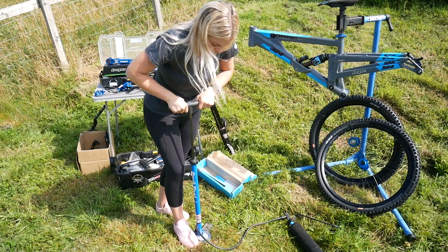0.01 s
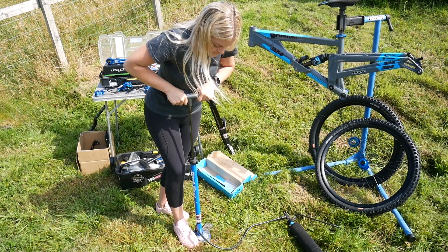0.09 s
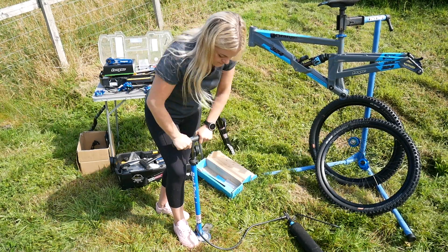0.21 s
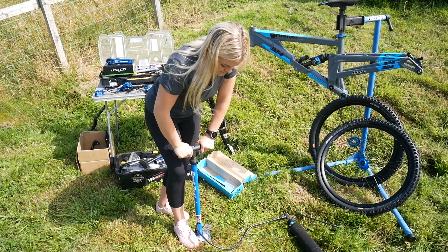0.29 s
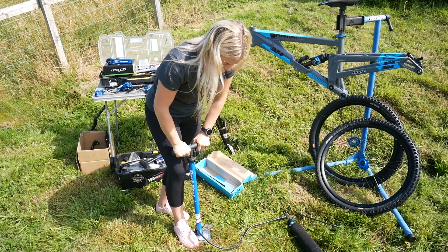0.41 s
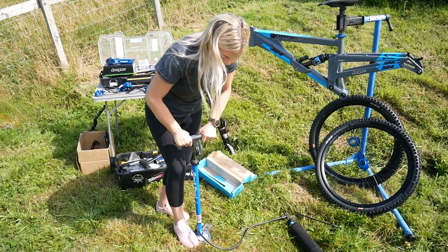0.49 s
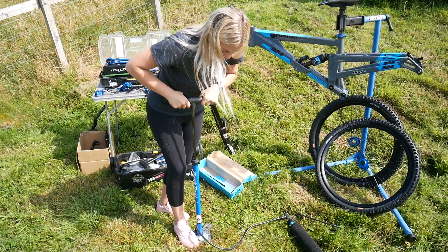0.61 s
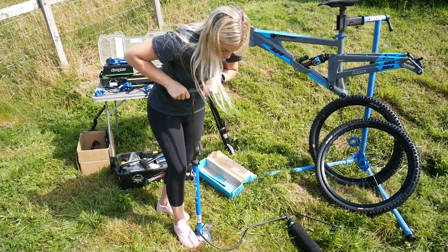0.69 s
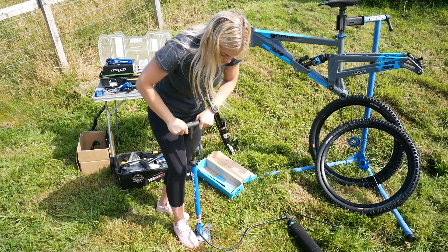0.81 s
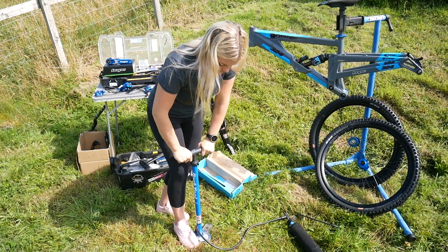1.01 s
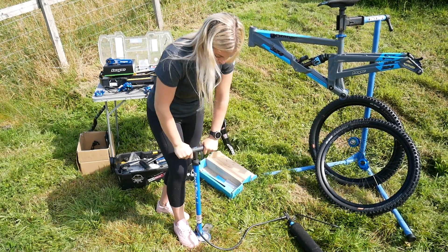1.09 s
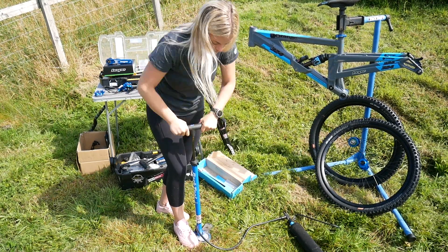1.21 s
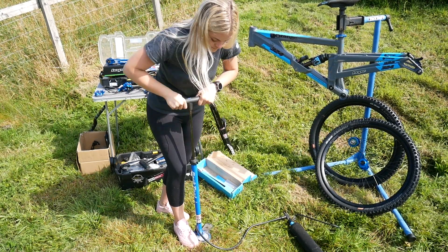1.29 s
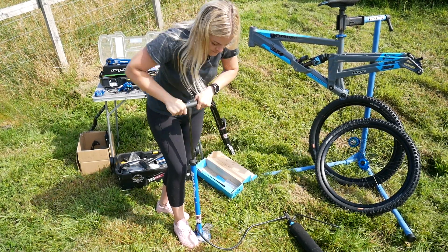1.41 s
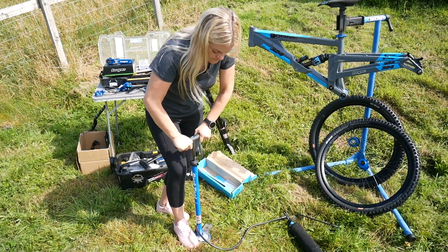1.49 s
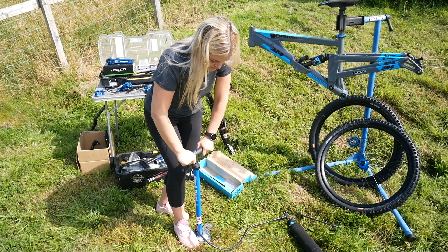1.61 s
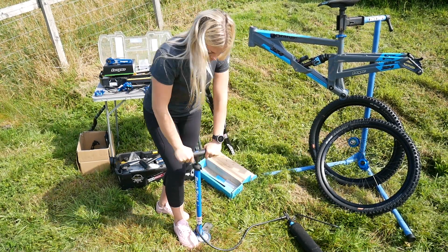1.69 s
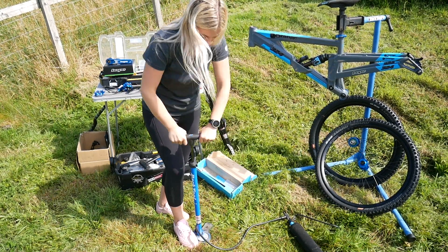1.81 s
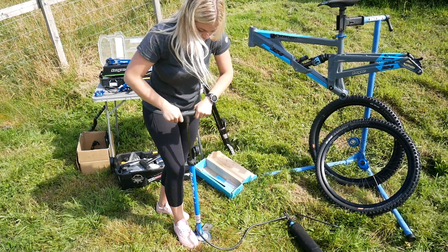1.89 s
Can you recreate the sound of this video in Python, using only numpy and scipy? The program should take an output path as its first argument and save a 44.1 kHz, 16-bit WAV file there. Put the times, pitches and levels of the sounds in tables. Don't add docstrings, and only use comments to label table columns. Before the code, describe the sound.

A bicycle floor pump, close and dry outdoors. Pushes hiss from about 0.12, 0.76 and 1.4 seconds; a reedy, fluttering squeak near 2 kHz bursts out at 0.25, briefly at 0.89, and at 1.53, lasting up to 0.16 seconds and sagging in pitch. Hollow handle knocks at 0.47, 1.15 and softer at 1.79 precede whispery suction upstrokes. Faint traffic rumble and low hum lie underneath.

```python
import sys
import numpy as np
from scipy import signal
from scipy.fft import rfft, irfft, next_fast_len
from scipy.io import wavfile
from scipy.ndimage import uniform_filter1d, map_coordinates

SR = 44100
rng = np.random.default_rng(int(sys.argv[2]) if len(sys.argv) > 2 else 0)


def dump(signal):
    limited = np.clip(np.atleast_2d(signal).T, -1, 1)
    pcm = np.round(limited * 32767).astype(np.int16)
    wavfile.write(sys.argv[1], SR, pcm)


def decibels_to_gain(level_db):
    exponent = np.asarray(level_db, float) / 20
    return 10 ** exponent


N = 85995

# [t/s, pitch f/Hz, level/dB, overtones/dB, half-pitch lines/dB]
SQUEAK_1 = [
    (0.2445, 2085, -19, -34, -1.5),
    (0.251, 1952, -17.5, 2, 1),
    (0.26, 1894, -24, 13.5, 1),
    (0.267, 1950, -22, 7, 3.5),
    (0.276, 1885, -21, 5.5, 17),
    (0.287, 2151, -14, -7.5, -6),
    (0.318, 2075, -15, -3.5, -1),
    (0.354, 2138, -15.5, -8, 3.5),
    (0.386, 1760, -36.5, -2, 2),
]
SQUEAK_2 = [
    (0.8895, 2090, -23, -25, 6),
    (0.894, 1923, -18.5, -2, -2),
    (0.902, 1869, -27, 8, 14),
    (0.917, 1957, -22.5, -0.5, -12),
    (0.924, 1759, -28.5, 18, -20),
    (0.939, 2008, -29.5, 17.5, -8),
    (0.951, 1900, -71, 3, 0),
    (0.965, 1880, -47, 0, 0),
    (0.98, 1780, -63, -5, 0),
]
SQUEAK_3 = [
    (1.528, 2247, -22.5, -3, -8),
    (1.536, 2034, -17.5, -9, -11),
    (1.549, 1801, -30, 11, -11),
    (1.562, 1836, -31, 10, -5),
    (1.572, 2038, -21.5, 5.5, 7),
    (1.606, 1949, -23, 6, 7.5),
    (1.645, 2006, -21, -5, 6),
    (1.664, 1940, -24, 3, -10),
    (1.688, 1707, -53, 18.5, -14),
]
# [t/s, pitch f/Hz, level/dB]
FLUTTER_1 = [
    (0.247, 2626, -42),
    (0.253, 2756, -37),
    (0.26, 2546, -40.5),
    (0.268, 2310, -30),
    (0.284, 2450, -31.5),
    (0.302, 2340, -59.5),
]
FLUTTER_2 = [
    (0.888, 2510, -44.5),
    (0.903, 2388, -33),
    (0.916, 2407, -31),
    (0.921, 2016, -37.5),
    (0.936, 2197, -21),
    (0.939, 2400, -58),
]
FLUTTER_3 = [
    (1.533, 2600, -50),
    (1.543, 2844, -32),
    (1.548, 2230, -39),
    (1.563, 2297, -27.5),
    (1.578, 2350, -42),
    (1.589, 2127, -32),
    (1.604, 2260, -49),
]
# [multiple of pitch, level/dB]
ORDER_LEVELS = [(.5, -46), (1, 2), (1.5, -40), (2, -19), (2.5, -48), (3, -31.5), (3.5, -49.5), (4, -27),
                (4.5, -58.5), (5, -38.5), (6, -38.5), (7, -45.5)]
# [t/s, flow level/dB]
PUSH_FLOWS = [
    [(0.12, -75.5), (0.15, -58), (0.185, -52), (0.27, -51), (0.37, -55.5), (0.43, -72)],
    [(0.755, -71.5), (0.785, -58), (0.815, -51.5), (0.93, -53.5), (1.04, -64.5), (1.11, -77)],
    [(1.395, -96), (1.43, -57.5), (1.46, -51.5), (1.56, -53.5), (1.66, -59.5), (1.74, -84.5)],
]
# [f/Hz, level/dB]
PUSH_COLOUR = [(710, -5.5), (1200, -9.5), (1380, -2.5), (3370, 1.5), (5860, -6.5), (7180, 3), (10500, -5.5),
               (12000, -7.5), (15300, -19)]
# [f/Hz, width/Hz, level/dB]
HOSE_TONES = [(430, 150, -7), (2150, 35, -5), (2650, 30, 0), (3230, 30, 1), (4400, 35, -1), (7400, 120, -6),
              (11300, 150, -17)]
# [opens t/s, shuts t/s, level/dB]
HOSE_OPEN = [
    (0.25, 0.43, -55),
    (0.9, 1.08, -54.5),
    (1.54, 1.74, -56),
]
# [t/s, length/s, f/Hz, level/dB]
BARREL_TONES = [
    (0.136, 0.084, 970, -51),
    (0.782, 0.074, 920, -52),
    (1.405, 0.11, 1080, -55),
]
# [middle t/s, width/s, level/dB]
PULLS = [
    (0.023, 0.047, -55.5),
    (0.59, 0.083, -57.5),
    (1.286, 0.061, -56),
    (1.94, 0.13, -61.5),
]
# [f/Hz, level/dB]
PULL_COLOUR = [(530, -91), (900, -9), (1240, -8), (1430, -12.5), (2040, -7.5), (2580, -6.5), (3470, -20.5),
               (7160, -15), (15300, -37)]
# [f/Hz, width/Hz, level/dB]
SEAL_MODES = [(2065, 250, 1.5), (2540, 166, 1.5), (3110, 530, -8)]
# [from t/s, to t/s, level/dB]
UPSTROKES = [
    (-0.1, 0.084, -62.5),
    (0.49, 0.712, -62),
    (1.167, 1.374, -63),
    (1.845, 2.05, -61.5),
]
# [f/Hz, level/dB]
WHISPER_COLOUR = [(2500, -2), (4000, 3), (6500, 1), (9000, -12), (12000, -7.5), (15300, -46)]
# [t/s, length/s, f/Hz, level/dB]
HOOTS = [
    (0.535, 0.033, 1306, -61),
    (0.564, 0.059, 1257, -61.5),
    (1.231, 0.03, 1390, -63),
    (1.865, 0.044, 1258, -60),
]
# [t/s, thud level/dB, tick level/dB]
KNOCKS = [
    (0.467, -39.5, -57.5),
    (0.68, -62, -53),
    (1.149, -38.5, -50),
    (1.39, -54, -79),
    (1.788, -52.5, -52),
]
# [f/Hz, level/dB]
FAR_COLOUR = [(15, -45.5), (25, -17), (245, -1), (1190, -17), (2150, -15), (2970, -14.5), (4330, -18),
              (5500, -25.5), (15300, -34)]
# [f/Hz, correlation]
FAR_ALIKE = [(200, -0.54), (600, -0.74), (1600, -0.27), (3300, 1), (5200, 0.49), (14800, 0.18)]
# [f/Hz, L-R level/dB]
PORT_LEVEL = [(1400, 2), (3000, 0), (7000, 1), (10500, -0.5), (12500, -13.5)]
# [f/Hz, phase/rad]
PORT_PHASE = [(300, -0.73), (1500, -0.3), (3500, 0.34), (5200, -0.86), (7800, -0.44), (9300, -1.97),
              (12000, 0.61), (15000, 0.4)]
# [f/Hz, level/dB]
SCATTER_COLOUR = [(1000, -15.5), (3300, -21.5), (4800, -7.5), (12000, -1.5)]


def unit(x):
    return x / np.sqrt(np.mean(x ** 2) + 1e-20)


def along(points, hz):
    f, v = np.transpose(points)
    return np.interp(np.log(hz + 1), np.log(f + 1), v)


def clock():
    return np.arange(N) / SR


def wobble(rate_hz):
    return map_coordinates(rng.standard_normal(N // 8), [clock() * rate_hz])


def filtered(x, response):
    m = next_fast_len(N + SR // 2)
    return irfft(rfft(x, m) * response(np.fft.rfftfreq(m, 1 / SR)), m)[..., :N]


def air(points):
    return unit(filtered(rng.standard_normal(N), lambda hz: decibels_to_gain(along(points, hz))))


def patchy(points):
    z = signal.stft(air(points), nperseg=256)[2]
    field = uniform_filter1d(rng.standard_normal(z.shape), 4, 0)
    field = uniform_filter1d(field, 6, 1)
    return unit(signal.istft(z * decibels_to_gain(2.5 * unit(field)), nperseg=256)[1][:N])


def resonant(modes):
    def shape(f):
        return sum(decibels_to_gain(db) * (1j * f * w / (c * c - f * f + 1j * f * w)) ** 2 for c, w, db in modes)
    return unit(filtered(rng.standard_normal(N), shape))


def track(rows):
    s, *cols = np.transpose(rows)
    t = clock()
    gate = np.clip(np.minimum(t - s[0], s[-1] - t) / 0.0029, 0, 1)
    return gate, t - s[0], [np.interp(t, s, c) for c in cols]


def squeak(main, flutter):
    lift_hz, lift_s = 452, 0.002106
    drift_hz, shake_hz, shake_db = 8, 29.8, 4.5
    jitter_hz, mirror, mixing = 63.8, 0.029, 0.22
    shimmer_db, breakup = 5, 2
    fuzz_rad, fuzz_rate_hz = 0.17, 450
    dull_db, settle_s = 6, .008
    gate, age, cols = track(main)
    hz, level_db, over_db, half_db = uniform_filter1d(cols, SR // 250, 1)
    gate2, _, (hz2, level2_db) = track(flutter)
    share = np.clip(gate2 * decibels_to_gain(level2_db - level_db), 0, 1.5)
    unrest = np.minimum(share, .5)

    hz = hz + lift_hz * np.exp(-np.abs(age) / lift_s)
    hz = hz + drift_hz * wobble(60) + shake_hz * unrest * wobble(250)
    half_turn = np.exp(1j * np.pi * np.cumsum(hz) / SR)
    beat = np.exp(2j * np.pi * np.cumsum(hz2 - hz + jitter_hz * wobble(300)) / SR)
    sides = share * (beat + mirror / beat)
    high_db = .5 * over_db - dull_db * (2 * unrest + np.exp(-np.abs(age) / settle_s))

    tone = 0
    for k, db in ORDER_LEVELS:
        if k == 1:
            extra_db = shake_db * unrest * wobble(200)
        else:
            extra_db = 0 if k < 1 else over_db if k < 3 else high_db
            extra_db = extra_db + shimmer_db * (wobble(69.74) + breakup * unrest * wobble(250))
            if k % 1:
                extra_db = extra_db + half_db
        fuzz = fuzz_rad * (1 + 2 * breakup * unrest * (k < 3)) * (k - 1) * wobble(fuzz_rate_hz)
        line = half_turn ** round(2 * k) * np.exp(1j * fuzz)
        line = line * (1 + sides * (1 if k == 1 else mixing))
        tone = tone + decibels_to_gain(db + extra_db) * line.imag

    rasp = air([(700, -34.5), (1500, -3.5), (2500, 9.5), (4000, 4), (8000, -5), (15000, -29)])
    return gate * decibels_to_gain(level_db) * (np.sqrt(2) * tone + decibels_to_gain(-6.5) * unrest * rasp)


def push():
    return push_hiss() + hose() + barrel()


def push_hiss():
    bright_hz, bright_swing, swing = 9900, 2.7, 1
    hiss = patchy(PUSH_COLOUR) * decibels_to_gain(0.96 * wobble(60.4))
    top = filtered(hiss, lambda hz: hz ** 4 / (hz ** 4 + bright_hz ** 4))
    out = 0
    for rows in PUSH_FLOWS:
        gate, _, (db,) = track(rows)
        peak_db = np.max(db)
        over_db = db - peak_db
        mix = decibels_to_gain(swing * over_db) * (hiss - top) + decibels_to_gain(bright_swing * over_db) * top
        out = out + gate * decibels_to_gain(peak_db + 8) * mix
    return out


def hose():
    t, tones = clock(), 0
    for hz, width_hz, db in HOSE_TONES:
        phase = 2 * np.pi * np.cumsum(hz + width_hz * wobble(90)) / SR
        tones = tones + decibels_to_gain(db + 3.5 * wobble(45)) * np.sin(phase)
    gates = 0
    for opens, shuts, db in HOSE_OPEN:
        gates = gates + decibels_to_gain(db) * np.clip(np.minimum((t - opens) / 0.0044, (shuts - t) / 0.044), 0, 1)
    return gates * unit(tones)


def barrel():
    column_width_hz, glide = 350, .9
    leak_hz, leak_rise_hz, leak_width_hz, leak_db = 7180, 4720, 420, 0
    out, t = 0, clock()
    for s, length, hz, db in BARREL_TONES:
        u = np.clip((t - s) / length, 0, 1)
        turn = 2 * np.pi * np.cumsum(leak_hz + leak_rise_hz * u ** 4.8) / SR
        leak = wobble(2 * leak_width_hz) * np.cos(turn) + wobble(2 * leak_width_hz) * np.sin(turn)
        start, end = [resonant([(hz * g, column_width_hz, 0)]) for g in (1, glide)]
        column = np.sqrt(1 - u) * start + np.sqrt(u) * end
        out = out + decibels_to_gain(db) * np.sin(np.pi * u ** 1.2) * (column + decibels_to_gain(leak_db) * leak)
    return out


def pull():
    t = clock()

    def swell(narrow):
        return sum(decibels_to_gain(db) * np.exp(-.5 * ((t - s) / (w * narrow)) ** 2) for s, w, db in PULLS)
    suction = swell(0.97) * patchy(PULL_COLOUR) * decibels_to_gain(3.0 * wobble(31.23))
    seal = decibels_to_gain(8.5 + 1.3 * wobble(46.9)) * swell(0.36) * resonant(SEAL_MODES)
    return suction + seal


def inlet():
    t, stroke, hoots = clock(), 0, 0
    for s, end, db in UPSTROKES:
        stroke = stroke + decibels_to_gain(db) * np.clip(np.minimum(t - s, end - t) / .045, 0, 1)
    for s, length, hz, db in HOOTS:
        swell = np.sin(np.pi * np.clip((t - s) / length, 0, 1))
        hoots = hoots + decibels_to_gain(db + 4.5 + 2.7 * wobble(58.8)) * swell * np.sin(2 * np.pi * hz * t)
    return stroke * patchy(WHISPER_COLOUR) + hoots


def knocks():
    thud_hz, thud_t60_s, thud_rise_s = 330, 0.058, 0.0036
    tick_hz, tick_width_hz, tick_t60_s, tick_rise_s = 3200, 1380, 0.035, 0.0031
    out, t = np.zeros(N + SR), np.arange(SR // 8) / SR
    grit = resonant([(tick_hz, tick_width_hz, 0), (7500, 3000, -24)])
    for s, thud_db, tick_db in KNOCKS:
        i = round(s * SR)
        thud = decibels_to_gain(thud_db + 9.5 - 60 * t / thud_t60_s) * (1 - np.exp(-t / thud_rise_s))
        thud = thud * np.sin(2 * np.pi * thud_hz * t)
        tick = decibels_to_gain(tick_db + 9.5 - 60 * t / tick_t60_s) * (1 - np.exp(-t / tick_rise_s))
        tick = tick * np.roll(grit, -i)[:len(t)]
        out[i:][:len(t)] += thud + tick
    return out[:N]


def ports(x):
    yard_t60_s, yard_db, yard_delay_s = 0.16, -24.5, 0.033

    def lean(hz):
        return decibels_to_gain(along(PORT_LEVEL, hz) / 2) * np.exp(.5j * along(PORT_PHASE, hz))

    def direct(hz):
        left, right = lean(hz), 1 / lean(hz)
        return np.array([left, right]) * 2 / (left + right + 0.44)

    def opposed(hz):
        return np.array([abs(lean(hz)), -1 / abs(lean(hz))])
    t = np.arange(SR // 3) / SR
    early = rng.standard_normal(len(t)) * decibels_to_gain(-60 * t / .035)
    scatter = signal.fftconvolve(x, early / np.linalg.norm(early))[:N]
    scatter = filtered(scatter, lambda hz: decibels_to_gain(along(SCATTER_COLOUR, hz)))
    tail = rng.standard_normal((2, len(t))) * decibels_to_gain(-60 * t / yard_t60_s) * np.clip(t / yard_delay_s, 0, 1)
    echo = signal.fftconvolve(x[None], tail / np.linalg.norm(tail[0]), axes=1)[:, :N]
    return 1.118 * filtered(x, direct) + filtered(scatter, opposed) + decibels_to_gain(yard_db) * echo


def far():
    far_db, hum_hz, hum_db, hum_side = -57, 227.2, -62, 0.66

    def spread(hz):
        width = np.tan(np.arccos(np.clip(along(FAR_ALIKE, hz), -1, 1)) / 2)
        return decibels_to_gain(along(FAR_COLOUR, hz)) * np.array([np.ones_like(hz), width])
    pair = rng.standard_normal((2, N)) * decibels_to_gain(1.48 * wobble(6.6))
    mid, side = filtered(pair, spread)
    scale = decibels_to_gain(far_db) / mid.std()
    phase = 2 * np.pi * np.cumsum(hum_hz + 3 * wobble(7.4)) / SR
    hum = np.sqrt(2) * decibels_to_gain(hum_db + 0.83 * wobble(3.3))
    mid = scale * mid + hum * np.sin(phase)
    side = scale * side + hum_side * hum * np.cos(phase)
    return np.array([mid + side, mid - side]) * decibels_to_gain([[-.65], [.65]])


def scene():
    valve = squeak(SQUEAK_1, FLUTTER_1) + squeak(SQUEAK_2, FLUTTER_2) + squeak(SQUEAK_3, FLUTTER_3)
    return ports(valve + push() + pull() + inlet() + knocks()) + far()


def low_pass(x):
    return signal.sosfilt(signal.butter(12, 15330, fs=SR, output="sos"), x)


def record(dry):
    low_cut_hz, top_hz = 65, 15330
    mix = filtered(dry, lambda hz: (hz < top_hz) * hz ** 2 / (hz ** 2 + low_cut_hz ** 2))
    return low_pass(mix)


dry = scene()
out = record(dry)
dump(out)
```